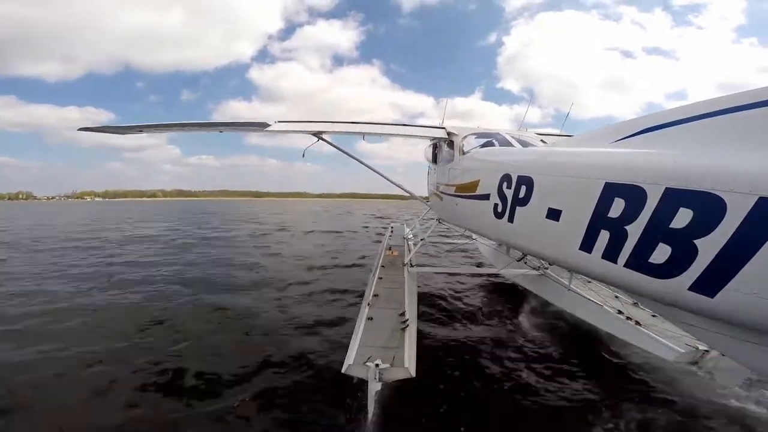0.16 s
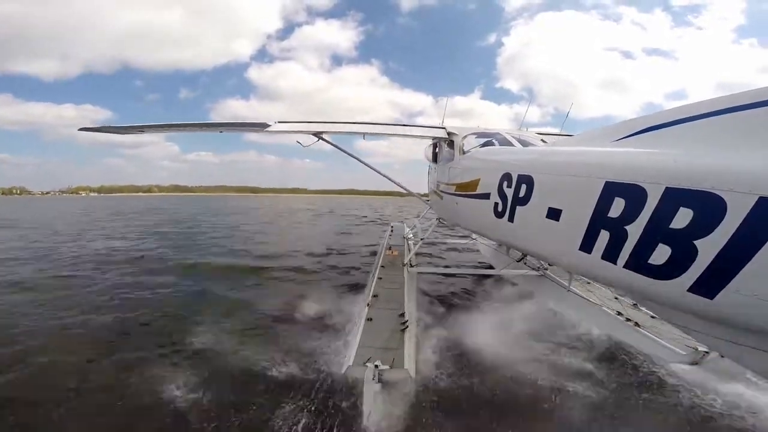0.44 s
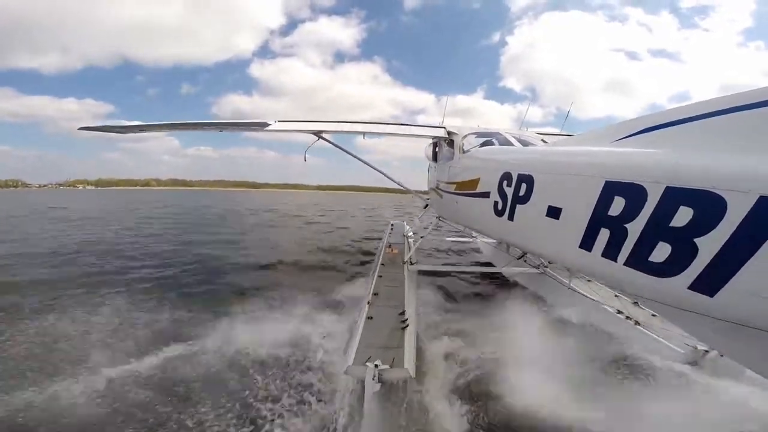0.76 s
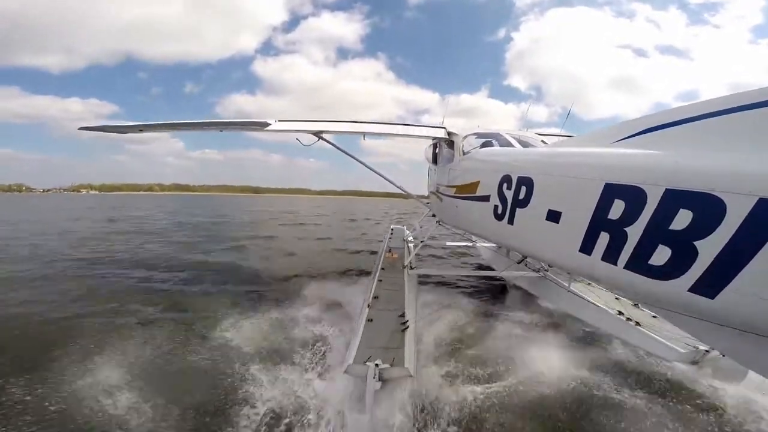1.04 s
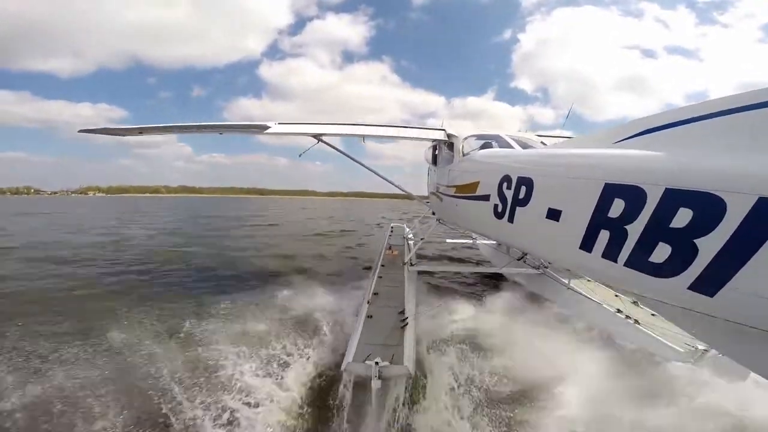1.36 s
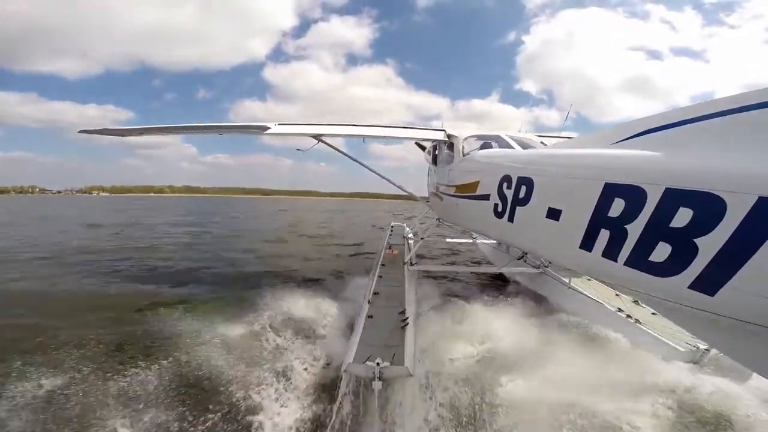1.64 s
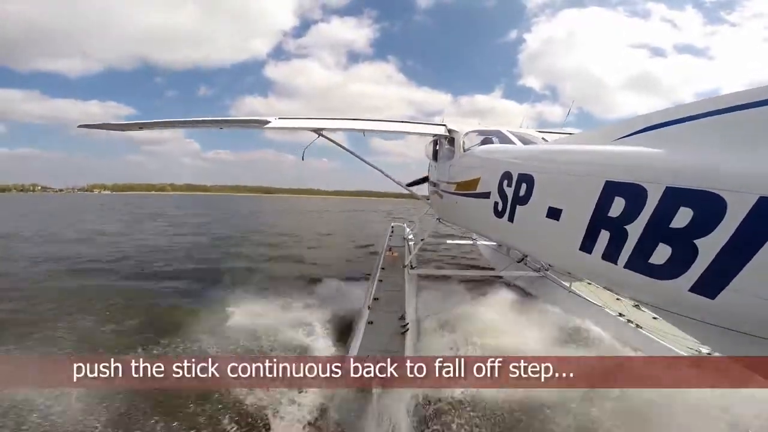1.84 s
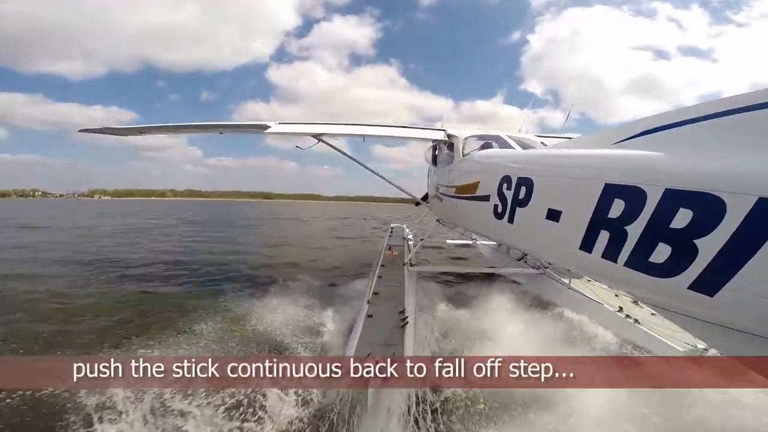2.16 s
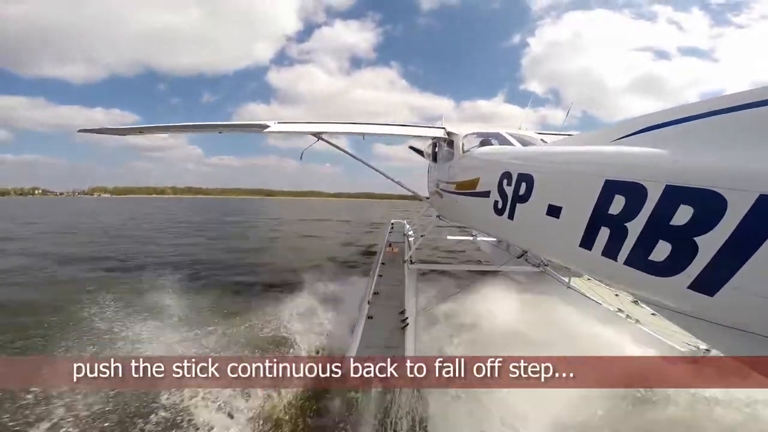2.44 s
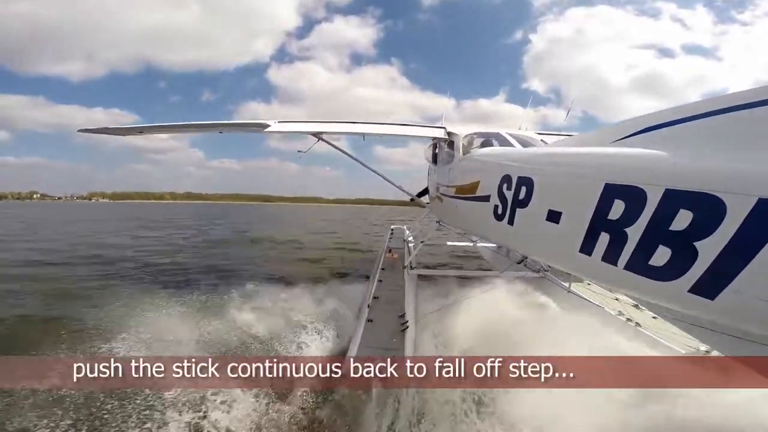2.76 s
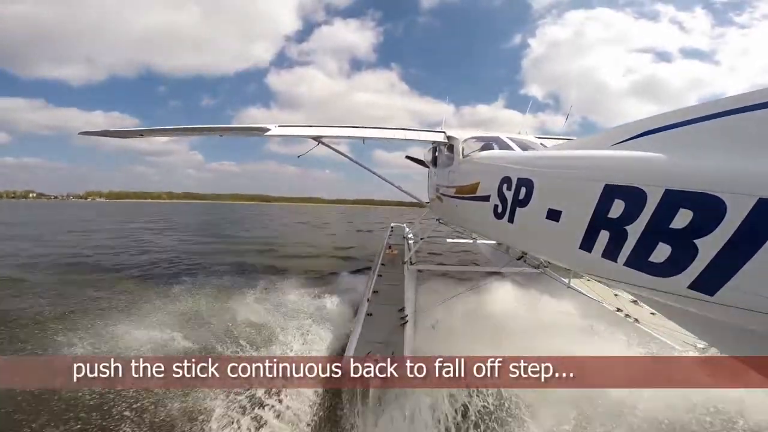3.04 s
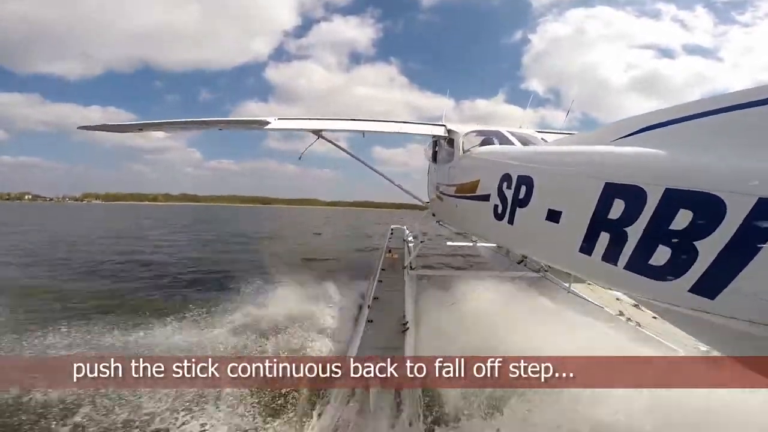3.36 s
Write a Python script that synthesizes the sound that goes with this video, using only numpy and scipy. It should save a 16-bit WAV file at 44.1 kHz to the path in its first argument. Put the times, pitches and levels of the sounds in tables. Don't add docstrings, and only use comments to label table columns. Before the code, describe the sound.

Water slams hollow metal floats as a small seaplane lands, with deep shaking and rushing spray

```python
import sys
import numpy as np
from scipy import signal
from scipy.io import wavfile
from scipy.ndimage import uniform_filter1d

SR = 44100
rng = np.random.default_rng(int(sys.argv[2]) if len(sys.argv) > 2 else 0)


def ratio_of_db(decibels):
    return 10 ** (np.asarray(decibels, float) / 20)


def int16_out(signal):
    q = np.round(np.clip(np.atleast_2d(signal).T, -1, 1) * 32767)
    wavfile.write(sys.argv[1], SR, q.astype(np.int16))


N = 153909
TIME_S = np.arange(N) / SR


def rms_one(x):
    return x / np.sqrt(np.mean(x ** 2) + 1e-20)


def in_time(rows):
    start_s, *columns = np.transpose(rows)
    return [np.interp(TIME_S, start_s, column) for column in columns]


def drift(rate_hz):
    step = 40
    r = np.exp(-2 * np.pi * step * rate_hz / SR)
    white = rng.standard_normal(N // step + 2002)
    slow = signal.lfilter([1], [1, -2 * r, r * r], white)[2000:]
    return np.interp(np.arange(N) / step, np.arange(len(slow)), rms_one(slow - slow.mean()))


def resonance(x, hz, width_hz):
    r = np.exp(-np.pi * width_hz / SR)
    feedback = [1, -2 * r * np.cos(2 * np.pi * hz / SR), r * r]
    return signal.lfilter(np.array([1, 0, -1]) * (1 - r * r) / 2, feedback, x)


def banded(colour, patchy_db, tilt_db=0):
    hz, db = np.transpose(colour)
    edges = hz[0] * 2 ** np.arange(0, np.log2(hz[-1] / hz[0]), 1 / 3)
    together = drift(11)
    white = rng.standard_normal((2, N + SR))
    out = 0
    for k, (low, high) in enumerate(zip(edges, edges[1:])):
        sos = signal.butter(2, [low, high], "band", fs=SR, output="sos")
        band = signal.sosfilt(sos, white[k % 2])[SR:]
        mid = np.sqrt(low * high)
        level_db = np.interp(np.log(mid), np.log(hz), db) + tilt_db * max(np.log2(mid / 2000), 0)
        out = out + band * ratio_of_db(level_db + patchy_db * (0.17 * together + drift(19)))
    return rms_one(out)


def boom_whoosh(airborne):
    roar = rms_one(resonance(rng.standard_normal(N), 560, 330))
    return airborne * ratio_of_db(-43.5 + 2 * drift(11)) * roar


def strut(airborne):
    hz, width_hz = 148, 28
    hum = resonance(resonance(rng.standard_normal(N), hz, width_hz), hz, width_hz)
    return airborne * ratio_of_db(-36 + 4 * drift(8)) * rms_one(hum)


def buffet(rush_db, airborne):
    # pitch_hz [Hz], level_db [dB per Hz]
    rumble_colour = [(14, -1.5), (26, -4.5), (38, -3.5), (50, 0), (75, -2), (330, -17.5), (420, -28.5),
                     (800, -27.5)]
    level_db = -31 + 0.58 * (rush_db - rush_db.mean()) - 5 * airborne
    return ratio_of_db(level_db) * banded(rumble_colour, patchy_db=3)


def rush(rush_db):
    # pitch_hz [Hz], level_db [dB per Hz]
    hiss_colour = [(500, -26.5), (900, 2), (1200, 4), (2400, 2), (3000, -9), (4000, -9), (6500, -14.5),
                   (15000, -45)]
    tilt_db = 0.069 * (rush_db - rush_db.mean()) / 10
    hiss = banded(hiss_colour, patchy_db=2.02, tilt_db=tilt_db)
    port = rms_one(resonance(rng.standard_normal(N), 4932, 130))
    return ratio_of_db(rush_db) * (hiss + ratio_of_db(-18) * port)


def tick():
    start_s, level_db, hz, width_hz, rise_s = 2.962, -41, 4200, 1200, 0.0025
    t = np.maximum(TIME_S - start_s, 0)
    swell = t / rise_s * np.exp(1 - t / rise_s)
    patter = resonance(resonance(rng.standard_normal(N), hz, width_hz), hz, width_hz)
    return ratio_of_db(level_db) * swell * patter * 5


def jolts():
    # start_s [s], level_db [dB], ring_hz [Hz], push_db [dB beside the click]
    knocks = [
        (0.6517, -19.5, 1500, -16),
        (0.655, -10.5, 1890, -6.5),
        (0.6625, -24, 1210, 11.5),
        (0.738, -31.5, 1500, -3),
        (0.7401, -17.5, 1960, 4.5),
        (0.7452, -17.5, 960, 9),
    ]
    ring_width_hz, push_s, top_hz = 600, 0.005, 2600
    out, t = np.zeros(N), np.arange(SR // 20) / SR
    for start_s, level_db, ring_hz, push_db in knocks:
        click = np.cos(2 * np.pi * ring_hz * t) * np.exp(-np.pi * ring_width_hz * t)
        push = ratio_of_db(push_db) * np.exp(-t / push_s)
        attack = np.clip(t * 4000, 0, 1)
        first = int(start_s * SR)
        out[first:first + len(t)] -= ratio_of_db(level_db) * attack * (click + push)
    return signal.sosfilt(signal.butter(8, top_hz, fs=SR, output="sos"), out)


def shake():
    # start_s [s], pitch_hz [Hz], level_db [dB]
    swing_path = [(0.0, 31.13, -21.5), (0.07, 30.38, -18.5), (0.14, 30.98, -33.5), (0.22, 30.35, -22.5),
                  (0.41, 29.88, -21), (0.55, 34.15, -17), (0.79, 34.41, -21.5), (1.45, 33.57, -20),
                  (1.55, 33.85, -29.5), (1.65, 33.49, -19), (2.51, 32.92, -19.5), (2.56, 32.12, -25),
                  (2.63, 29, -18), (2.68, 27.39, -23.5), (2.96, 27.71, -11.5), (3.01, 27.42, -27.5),
                  (3.15, 32.13, -22), (3.49, 31.65, -16.5)]
    # centre_s [s], lost_db [dB], half_length_s [s]
    slacks = [(0.365, 5.5, 0.031), (0.723, 6, 0.029), (.8, 2.5, 0.036), (1.281, 8, 0.019), (1.70, 5, 0.022),
              (1.849, 7, 0.01), (2.08, 4, 0.048), (2.2, 2.5, 0.05), (2.332, 7.5, 0.023), (2.79, 5, 0.014),
              (3.072, 7, 0.015), (3.207, 3, 0.048)]
    second_db, third_db, wander_hz, flutter_db = -18.5, -23.5, 1.74, 1.63
    hz, db = in_time(swing_path)
    for centre_s, lost_db, half_s in slacks:
        db = db - lost_db * np.exp(-((TIME_S - centre_s) / half_s) ** 2)
    phase = 2 * np.pi * np.cumsum(hz + wander_hz * drift(3.6)) / SR
    swing = np.cos(phase) + ratio_of_db(second_db) * np.cos(2 * phase) + ratio_of_db(third_db) * np.cos(3 * phase)
    return np.sqrt(2) * ratio_of_db(db + flutter_db * drift(8.7) + 1.31 * drift(40)) * swing


def booms():
    # centre_s [s], peak_db [dB], pitch_hz [Hz], half_length_s
    # [s]
    single_knocks = [(.44, -24, 148, 0.026), (0.44, -35, 320, 0.01), (0.367, -33, 305, 0.012),
                     (0.59, -24.5, 100, 0.013), (.75, -19, 113, 0.017), (1.02, -24, 219, 0.012),
                     (1.073, -23, 113, 0.038), (1.098, -18, 182, 0.011), (1.143, -14.5, 90, 0.0098),
                     (1.19, -23.5, 108, 0.016), (1.337, -23, 100, 0.024), (1.355, -28.5, 600, 0.011),
                     (1.491, -22.5, 107, 0.014), (1.847, -25.5, 103, 0.013), (2.096, -24.5, 101, 0.027),
                     (2.30, -25, 100, 0.008), (2.612, -25, 102, .012), (2.81, -21.5, 124, 0.019),
                     (2.87, -22.5, 156, 0.0086), (2.892, -13, 94, 0.0081), (2.90, -26, 494, 0.011),
                     (2.735, -18, 61, .015), (2.815, -19.5, 55, 0.02), (2.91, -23, 78, 0.012),
                     (3.035, -16, 55, 0.012), (3.135, -13, 50, 0.012), (.742, -23, 270, 0.0068),
                     (.742, -37, 420, 0.007), (.741, -51, 3000, .003), (1.329, -27, 450, 0.0025),
                     (1.5, -37, 1200, 0.0034), (1.091, -23.5, 606, .004), (1.42, -29.5, 560, 0.0045),
                     (2.881, -26.5, 630, 0.0047), (1.905, -34, 498, 0.0066), (0.67, -44, 690, 0.0032),
                     (1.90, -34, 172, 0.013), (2.44, -35, 156, 0.027), (1.27, -33.5, 160, 0.027),
                     (1.135, -35.5, 1240, 0.0066), (3.128, -24.5, 304, .012), (3.335, -27.5, 163, .012),
                     (3.373, -23.5, 100, 0.0088)]
    out = np.zeros(N)
    for centre_s, peak_db, hz, half_s in single_knocks:
        t = TIME_S - centre_s
        out += ratio_of_db(peak_db) * np.exp(-(t / half_s) ** 2) * np.cos(2 * np.pi * hz * t)
    return out


def ring_floats(low, high):
    # pitch_hz [Hz], width_hz [Hz], level_db [dB]
    float_rings = [(107, 45, -5.5), (156.7, 37, -8), (210.1, 18.5, -5.5), (265, 47, -13), (331, 40, -8),
                   (402, 35, -13), (458, 78, -10.5), (562, 98, -8), (637, 126, -10), (1031, 300, -16),
                   (1810, 860, -22.5)]
    out = 0
    for k, (hz, width_hz, level_db) in enumerate(float_rings):
        push = high if hz > 370 else low
        ring = resonance(resonance(push, hz, 2 * width_hz), hz, width_hz)
        out = out + (-1) ** k * ratio_of_db(level_db) * ring / np.sqrt(width_hz)
    return out


def slams():
    # [dB, higher pitches beside deep]
    waves = [(0.004, -19, 0.062, -6.5), (0.078, -26.5, 0.042, -4), (0.164, -26, 0.12, -7),
             (0.307, -29, 0.042, -39), (0.45, -43, 0.03, 15), (0.542, -27, 0.023, 0.5),
             (0.595, -20, 0.039, -5), (0.804, -27.5, 0.042, -4.5), (0.984, -17.5, 0.052, 1.5),
             (1.053, -13, 0.02, -1), (1.078, -14.5, 0.063, 4), (1.135, -16.5, 0.044, -4.5),
             (1.195, -24.5, 0.024, -5.5), (1.264, -24.5, 0.047, -1), (1.322, -11.5, 0.036, -2.5),
             (1.403, -25.5, 0.028, 4), (1.466, -17.5, 0.056, -2), (1.545, -21.5, 0.048, -3.5),
             (1.838, -30, 0.094, 0.5), (1.981, -33, 0.014, -0.2), (2.063, -20.5, 0.076, -1.5),
             (2.193, -32.5, 0.033, 3), (2.263, -28.5, 0.027, -2), (2.59, -31.5, 0.011, 7.5),
             (2.701, -22.5, 0.12, -4.5), (2.776, -27, 0.047, -16), (2.853, -14.5, 0.02, -6),
             (2.873, -12.5, 0.032, -0.5), (2.96, -19.5, 0.064, -6), (3.047, -23, 0.073, -7.5),
             (3.104, -15.5, 0.015, -7.5), (3.237, -22, 0.11, -6.5), (3.317, -25.5, 0.056, -10.5),
             (3.437, -30, 0.039, -1.5)]
    attack_s, release_s, trim_db, drops_per_s, drop_spread_db = 0.0023, 0.016, -9.5, 3000, 3
    power = np.zeros((2, N))
    for start_s, peak_db, length_s, upper_db in waves:
        rise = np.clip((TIME_S - start_s) / attack_s, 0, 1)
        fall = np.exp(-np.maximum(TIME_S - start_s - length_s, 0) / release_s)
        level = ratio_of_db(peak_db + trim_db + np.array([[0], [upper_db]]))
        power += (level * rise * fall) ** 2
    sizes = ratio_of_db(drop_spread_db * np.minimum(rng.exponential(1, N), 4)) * rng.choice([-1, 1], N)
    drops = rms_one(sizes * (rng.random(N) < drops_per_s / SR))
    low, high = drops * np.sqrt(power) + 1e-18
    return ring_floats(low, high) / np.std(ring_floats(drops, drops))


def scene():
    # start_s [s], level_db [dB]
    rush_path = [(0.0, -42.5), (0.11, -36), (0.45, -36.5), (0.6, -47.5), (0.79, -58), (1.09, -42),
                 (1.24, -48.5), (1.36, -42.5), (1.39, -50.5), (1.71, -42.5), (2.01, -53), (2.41, -45),
                 (2.44, -54.5), (2.91, -41), (3.25, -52), (3.28, -44.5), (3.46, -59), (3.49, -56)]
    rush_db, = in_time(rush_path)
    touchdown_s, fade_s = 0.51, 0.044
    airborne = np.clip((touchdown_s - TIME_S) / fade_s + 1, 0, 1)
    air = boom_whoosh(airborne) + strut(airborne) + buffet(rush_db, airborne) + rush(rush_db)
    knocks = tick() + jolts() + booms()
    return (air + knocks + shake() + slams())[None]


def limit(dry):
    limit_db, release_db_per_s, attack_s = -10, 120, 0.002
    fall_db = release_db_per_s * TIME_S
    over_db = np.maximum(20 * np.log10(np.abs(dry) + 1e-9) - limit_db, 0)
    held_db = np.maximum.accumulate(over_db + fall_db, axis=1) - fall_db
    r = np.exp(-1 / (attack_s * SR))
    return dry * ratio_of_db(-signal.lfilter([1 - r], [1, -r], held_db))


def thin_treble(x):
    # centre_s [s], drop_db [dB by which the bar drops]
    clear_moments = [(.02, -1), (.06, 13.5), (0.112, 35), (.15, 23), (.18, 18), (0.229, 26), (0.292, 24),
                     (0.358, 28), (0.401, 20), (.46, 13), (.53, 17), (0.549, 16), (0.591, -7), (.63, 8),
                     (.71, 26), (0.781, 22), (.865, 27), (0.938, 11.5), (1.01, 17), (1.08, 4.5), (1.12, 12),
                     (1.23, 18), (1.288, 9), (1.34, 8), (1.42, 12), (1.53, 16.5), (1.582, 25), (1.63, 17),
                     (1.70, 32.5), (1.782, 13), (1.85, 24), (1.892, 18), (1.971, 11.5), (2.041, 9),
                     (2.122, 16.5), (2.17, 4.5), (2.21, 34), (2.251, 9), (2.348, 16), (2.412, 5),
                     (2.552, 23), (2.618, 29), (2.70, 30), (2.77, 6.5), (2.809, 6), (2.881, 8), (2.961, 7),
                     (3.02, 6), (3.06, 9.5), (3.119, 28), (3.21, 7), (3.28, 3.5), (3.37, 12.5), (3.43, 24)]
    frame, clear_s = 940, 0.015
    treble_hz, bar_db, follows, chance_db = 1700, -79.5, 0.35, 1.6
    window = np.sin(np.pi * (np.arange(2 * frame) + 0.5) / (2 * frame))
    hz, s, lines = signal.stft(x, SR, window, 2 * frame, frame)
    power = np.abs(lines) ** 2
    line_db = 20 * np.log10(np.abs(lines) + 1e-12)
    band_db = 10 * np.log10(uniform_filter1d(power, size=9, axis=0) + 1e-24)
    loud_db = 10 * np.log10(np.sum(power[(hz > 900) & (hz < 2800)], axis=0) + 1e-12)
    drops_db = [drop_db * np.exp(-((s - centre_s) / clear_s) ** 4) for centre_s, drop_db in clear_moments]
    bar = bar_db + follows * (loud_db - loud_db.mean()) - np.max(drops_db, axis=0)
    bar = bar + chance_db * rng.normal(0, 1, len(s))
    patches_db = 2 * np.repeat(rng.normal(0, 1, (len(hz) // 16 + 1, len(s))), 16, axis=0)[:len(hz)]
    keep = (0.65 * line_db + 0.35 * band_db + patches_db > bar) | (hz[:, None] < treble_hz)
    return signal.istft(lines * keep, SR, window, 2 * frame, frame)[1][:N]


def low_pass(x):
    return signal.sosfilt(signal.butter(12, 13480, fs=SR, output="sos"), x)


def record(dry):
    rounded = 0.38 * np.tanh(limit(dry)[0] / 0.43)
    mix = thin_treble(rounded)[None]
    return low_pass(mix)


dry = scene()
out = record(dry)
int16_out(out)
```